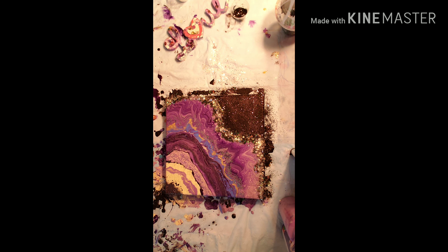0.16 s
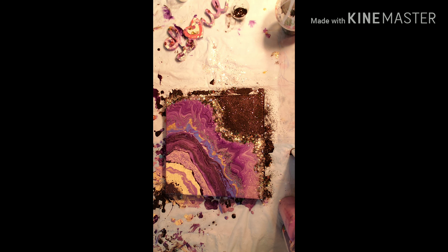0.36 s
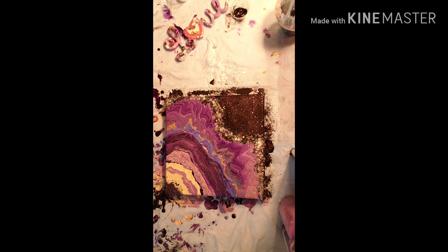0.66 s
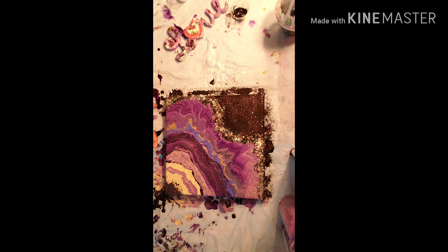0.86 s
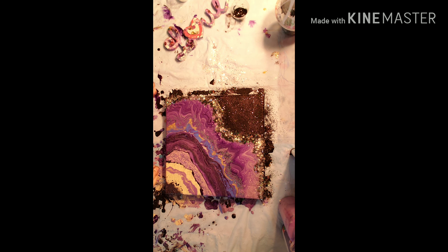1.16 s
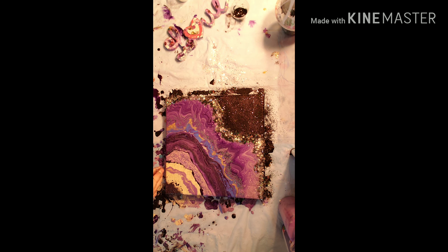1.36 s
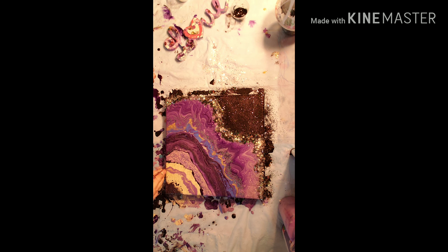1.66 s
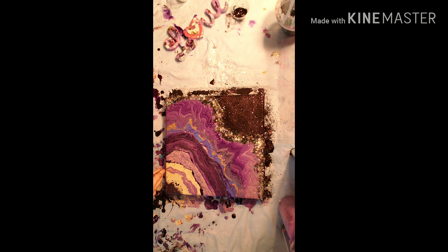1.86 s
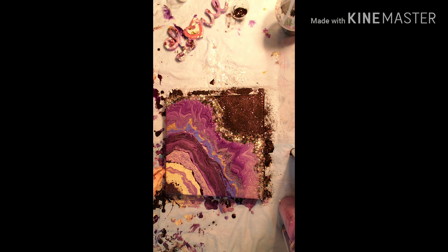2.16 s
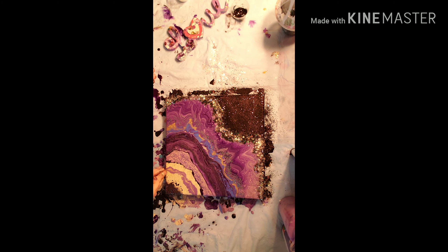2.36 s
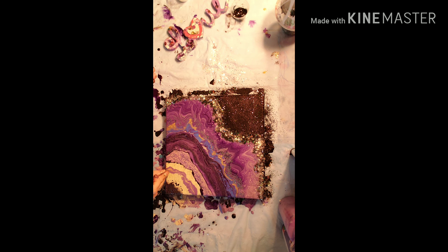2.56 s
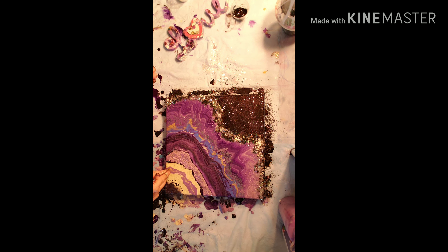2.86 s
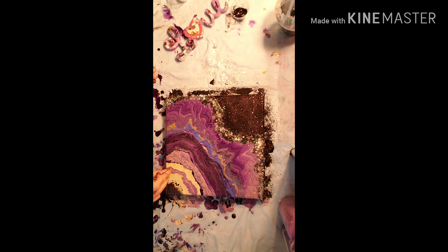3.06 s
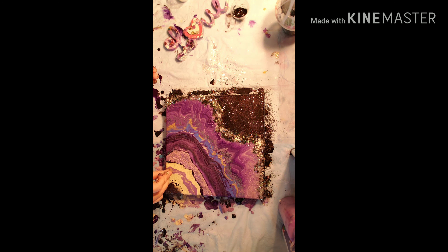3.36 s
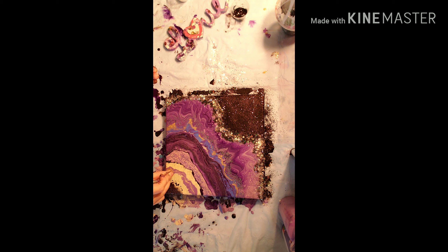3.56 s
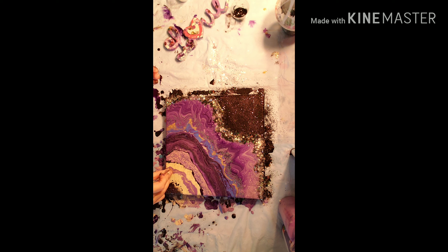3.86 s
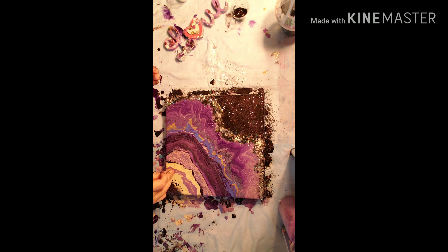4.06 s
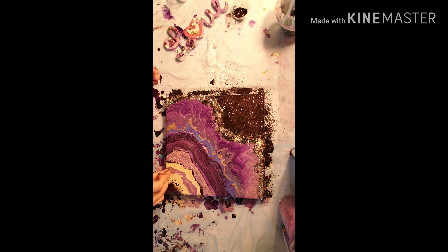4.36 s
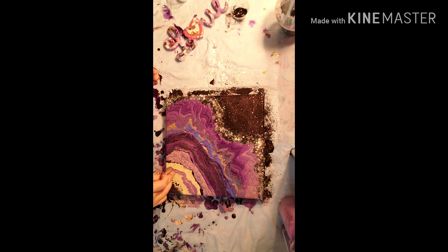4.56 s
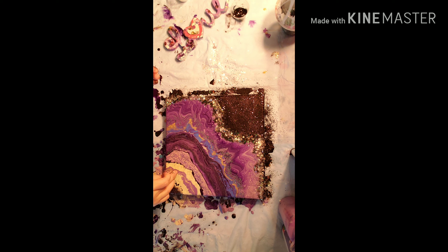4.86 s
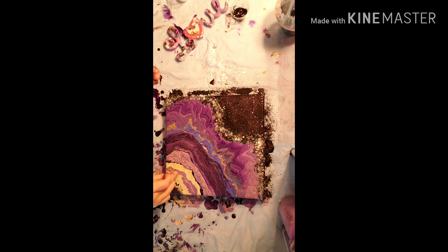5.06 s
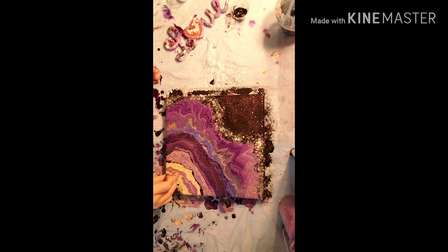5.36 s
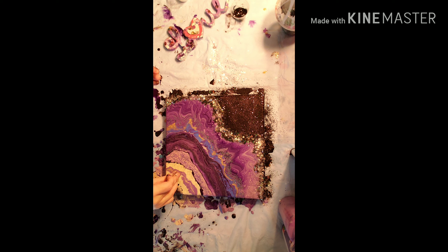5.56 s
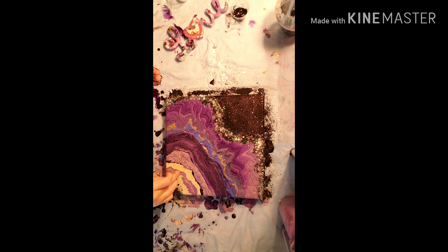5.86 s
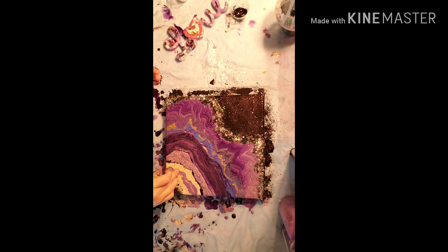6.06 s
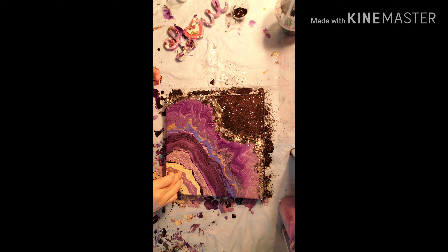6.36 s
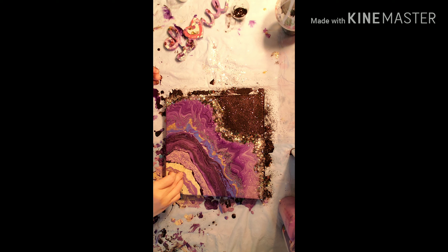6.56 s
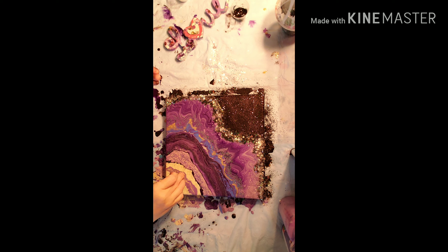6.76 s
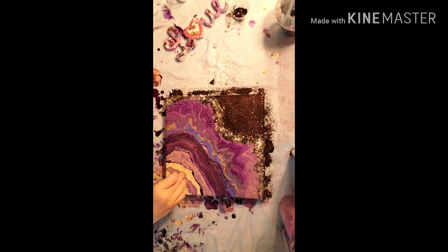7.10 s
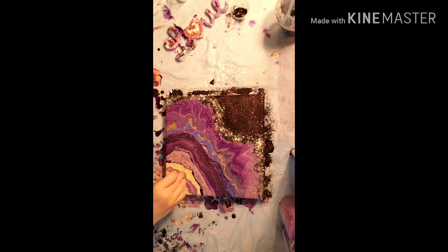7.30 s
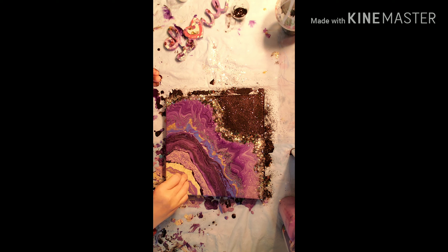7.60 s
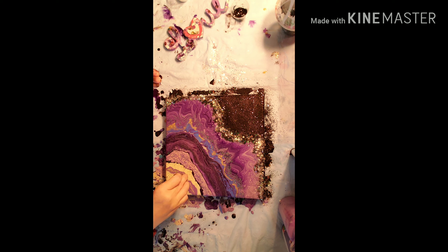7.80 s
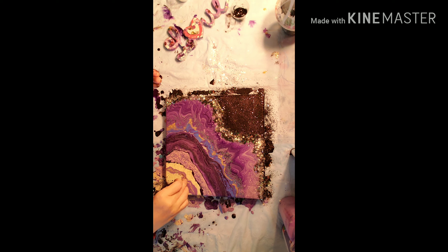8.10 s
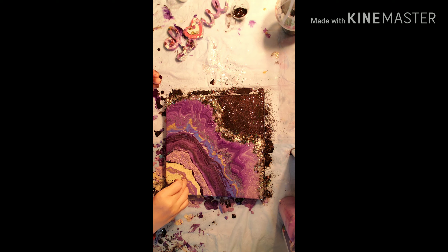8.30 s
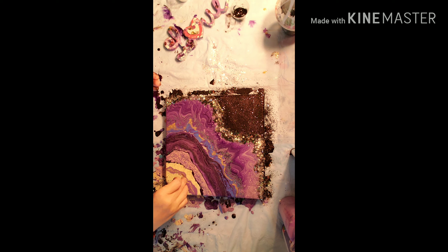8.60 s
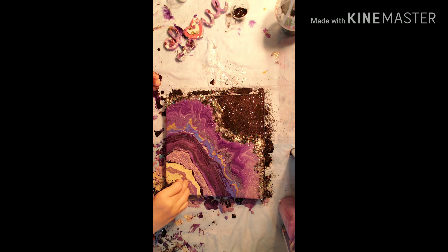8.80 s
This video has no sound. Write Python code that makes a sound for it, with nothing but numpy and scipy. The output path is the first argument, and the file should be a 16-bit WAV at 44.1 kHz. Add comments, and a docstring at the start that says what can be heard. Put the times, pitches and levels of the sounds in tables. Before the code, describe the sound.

A cooling appliance hums and throbs deeply in a quiet room, fans pushing soft air, with faint distant bird whistles and barely audible finger scuffs.

```python
"""A quiet room where a cooling appliance runs: its compressor throbs against the mains hum, two fans
drone and push air, the casing sings weakly and a thin whine swells and fades. All are locked or
wandering sines over shaped noise. Some way off a bird gives six faint falling whistles, gliding sines
with an overtone, while fingers work lightly on a table close by, as short bursts of filtered grit.
The microphones add their own hiss."""
import sys
import numpy as np
from scipy import signal
from scipy.fft import rfft, irfft
from scipy.io import wavfile

SR = 44100
rng = np.random.default_rng(int(sys.argv[2]) if len(sys.argv) > 2 else 0)


def persist_wave(psi):
    """Save psi, clipped to +-1, as 16-bit WAV."""
    counts = np.round(np.clip(psi, -1, 1) * 32767).astype(np.int16)
    wavfile.write(sys.argv[1], SR, np.atleast_2d(counts).T)


N = 394254
TIME = np.arange(N) / SR  # seconds
FREQS = np.fft.rfftfreq(N, 1 / SR)  # Hz
SIDES = np.array([[1], [-1]])  # left, right


def undb(db):
    """Decibels to gain."""
    return 10 ** (np.asarray(db) / 20)


def across(points):
    """A curve through (Hz, value) points, joined on a log-frequency axis."""
    hz, value = np.transpose(points)
    return np.interp(np.log(FREQS + 1), np.log(hz), value)


def walk(rate):
    """Smooth chance of spread 1 that moves about rate times a second."""
    lowpass = np.exp(-.5 * np.minimum(FREQS / rate, 20) ** 2)
    y = irfft(rfft(rng.standard_normal(N)) * lowpass, N)
    return (y - y.mean()) / y.std()


def tone(phase, db, pan_db, lead):
    """A sine as it reaches the two microphones through the room's standing waves; lead in radians."""
    gain = np.sqrt(2) * undb(db + SIDES * pan_db / 2)
    return gain * np.cos(phase + SIDES * lead / 2)


def orders(lines, phase):
    """The lines of one part, each a whole multiple locked to its turning."""
    return sum(tone(round(k) * phase, db, pan_db, lead) for k, db, pan_db, lead in lines)


# How alike the noise is at the two ears. Each row: frequency in Hz, likeness from 0 to 1.
LIKENESS = [(60, .98), (130, .95), (180, .75), (250, .95), (380, .68), (490, .8), (640, .35), (900, .4),
            (1300, .5), (1800, .1), (4000, .03), (15000, 0)]
# How the noise leans to one side. Each row: frequency in Hz, left minus right in dB.
BALANCE = [(110, -0.7), (200, -3), (700, -3), (1300, -1.3), (2400, 1.2), (5200, 2), (7400, 5.5),
           (8600, 0.5), (11000, 0), (11900, -3), (13000, 0), (15000, -3.5)]
LEFT_LEAD_S = .00027


def noise(spectrum):
    """Stereo noise of a given dB per Hz: its shared part reaches the left first; the treble is unrelated."""
    shared, *own = rfft(rng.standard_normal((3, N)))
    like = np.clip(across(LIKENESS), 0, 1)
    left_first = np.exp(1j * np.pi * FREQS * LEFT_LEAD_S * SIDES)
    pair = np.sqrt(like) * shared * left_first + np.sqrt(1 - like) * np.array(own)
    color = undb(across(spectrum) + SIDES * across(BALANCE) / 2)
    return irfft(pair * color, N) * np.sqrt(SR / 2)


def room(x, t60, wet_db):
    """Direct sound plus a short diffuse tail (t60 in seconds), different at each microphone."""
    t = TIME[:SR // 2]
    envelope = np.exp(-np.log(1000) * t / t60) * (1 - np.exp(-t / 0.0037))
    tail = rng.standard_normal((2, len(t))) * envelope
    tail /= np.sqrt(np.sum(tail ** 2, axis=1, keepdims=True))
    wet = signal.fftconvolve(x[None], tail, axes=1)[:, :N]
    return (x + undb(wet_db) * wet) / np.sqrt(1 + undb(2 * wet_db))


SHAFT_HZ, MAINS_HZ = 58.64, 60.02
THROB_S, BASS_SWELL_S = 4.367, 3.9  # moments when shaft meets mains, and when the bass tones fall in step
# Lines of the compressor shaft. Each row: multiple of the shaft rate, level in dB,
# left minus right in dB, left lead in radians.
COMPRESSOR = [(2, -44.5, 0, -0.62), (4, -72, 3, 3.5), (6, -88.5, -4, 0.5), (11, -85.5, -9, 3.5),
              (13, -83, 3, -0.5), (14, -90.5, -10.5, 1.4), (21, -90.5, -6, 1)]
# Mains hum of the magnetised iron. Each row: multiple of the mains rate, level in dB,
# left minus right in dB, left lead in radians.
MAINS = [(2, -44.5, -0.5, -0.14), (4, -69.5, 5.5, -0.013), (6, -81.5, 1, -1.5)]
# Close low tones at and just above the shaft rate. Each row: Hz above the shaft rate, level in dB.
BASS_TONES = [(0, -47.5), (.38, -57), (0.691, -50)]


def compressor(wander_rad=0.024):
    """The motor slips just behind the mains, so their second multiples beat nearly three times a second.
    Its once-a-turn note beats slowly with close tones: a swell every second and a half, alternately
    strong and weak."""
    turn = 2 * np.pi * (TIME - THROB_S)
    shaft = SHAFT_HZ * turn + wander_rad * walk(0.52)
    drift = 2 * np.pi * (TIME - BASS_SWELL_S)
    bass = sum(tone(shaft + above_hz * drift, db, pan_db=-0.5, lead=0.24)
               for above_hz, db in BASS_TONES)
    return bass + orders(COMPRESSOR, shaft) + orders(MAINS, MAINS_HZ * turn)


BLOWER_HZ, FAN_HZ = 18.33, 194.98
# Lines of the slow blower wheel. Each row: multiple of the blower rate, level in dB,
# left minus right in dB, left lead in radians.
BLOWER = [(1, -72, -1, .7), (2, -53, -1, .4), (6, -50.5, -1, 0.12), (7, -58.5, -2, .1), (8, -64, 6, 0.37),
          (9, -74.5, -2.5, 0.34)]
# Blade tones of the small fan. Each row: multiple of the blade rate, level in dB before flutter,
# left minus right in dB, left lead in radians.
FAN = [(1, -48, -3.5, 0.78), (2, -60.5, -4.5, 0.91), (3, -81.5, -1.5, 0.67)]


def fans(blower_wobble_rad=0.066, fan_wobble_rad=0.45, flutter_db=1.1):
    """A slow blower wheel and a small fan whose blade tones flutter in the turbulent air, the higher more."""
    blower_turn = 2 * np.pi * (BLOWER_HZ * TIME + rng.random())
    blower = orders(BLOWER, blower_turn + blower_wobble_rad * walk(0.7))
    blades = 2 * np.pi * FAN_HZ * TIME + fan_wobble_rad * (walk(0.56) + .5 * walk(7))
    fan = sum(orders([line], blades) * undb(flutter_db * line[0] * walk(6.2)) for line in FAN)
    return blower + fan


# Steady tones of the casing. Each row: frequency in Hz, level in dB, left minus right in dB,
# left lead in radians.
CASING = [(67.75, -54, -0.2, -0.2), (90.6, -55, 0, -0.3), (101.7, -54.5, 1.5, 0.05), (145.3, -63, 0, 0),
          (175.9, -65, -8.5, 0), (824, -85.5, 7.5, -0.7), (1006, -86.5, -7, 0.4), (1185, -84, -3.5, -2.5),
          (1238, -87, -6, 2), (3900, -99, -2.5, 1.2), (8213, -102, 8, 4), (8332, -104, 3.5, 1.2)]


def casing(wobble_rad=0.21):
    """Weak tones of the vibrating casing, each wandering in phase on its own."""
    return sum(tone(2 * np.pi * (hz * TIME + rng.random()) + wobble_rad * walk(0.99), db, pan_db, lead)
               for hz, db, pan_db, lead in CASING)


WHINE_HZ, WHINE_BEAT_HZ, WHINE_SWELL_S = 1121.35, 1.33, 4.66


def whine():
    """Two close high tones that swell and fade as they beat."""
    phase = 2 * np.pi * WHINE_HZ * TIME
    beat = 2 * np.pi * WHINE_BEAT_HZ * (TIME - WHINE_SWELL_S)
    lower = tone(phase, db=-73.5, pan_db=-1.5, lead=2.07)
    upper = tone(phase + beat, db=-80.0, pan_db=1.0, lead=1.8)
    return lower + upper


# Duct rumble. Each row: frequency in Hz, density in dB per Hz before the sway.
RUMBLE = [(18, -89.5), (29, -77), (40, -70.5), (50, -65.5), (59, -64.5), (70, -58), (85, -64.5),
          (102, -61.5), (122, -63), (138, -70), (188, -71), (208, -79), (250, -77.5), (400, -105),
          (900, -160)]
# Rushing air. Each row: frequency in Hz, density in dB per Hz before the sway.
AIR = [(150, -96.5), (280, -81.5), (345, -83.5), (385, -82), (425, -85.5), (485, -85.5), (560, -92.5),
       (790, -92.5), (1000, -94.5), (1210, -99), (1340, -103.5), (1600, -110.5), (3500, -118.5),
       (7000, -136)]


def airflow(rumble_sway_db=0.85, air_sway_db=1.0):
    """Low duct rumble that sways slowly, under a rush of air that flutters faster."""
    rumble = noise(RUMBLE) * undb(rumble_sway_db * walk(1.8))
    return rumble + noise(AIR) * undb(air_sway_db * walk(16.0))


# Every whistle arches to the same top pitch, then falls ever faster while its overtone grows.
WHISTLE_TOP_HZ, WHISTLE_FALL_HZ, WHISTLE_CREST_SHARE, WHISTLE_BEND = 3494, 325.3, .19, 1.4
OVERTONE_OPEN_DB, OVERTONE_CLOSE_DB = -27.5, -9.5  # relative to the whistle
# Bird whistles. Each row: start in seconds, length in seconds, opening level in dB, closing level in dB,
# both before fades, flicker and room.
WHISTLES = [(0.185, 0.29, -80.5, -84), (1.822, 0.26, -80, -71), (2.397, .31, -71.5, -76),
            (3.25, 0.36, -87, -89), (6.326, .285, -73.5, -67.5), (6.848, 0.3, -64.5, -73.5)]


def bird(quaver=.008, rasp_rad=0.18, flicker_db=2.0, onset=0.15, release=0.12, ease_db=-2, pan_db=-4.5):
    """Hoarse whistles that arch, ease off midway and fall, roughening and gaining an overtone."""
    tremor = quaver * walk(170)  # share of the pitch
    flicker = flicker_db * walk(25)
    hoarse = rasp_rad * walk(1100)  # fast phase jitter spreads a faint skirt around the line
    out = np.zeros(N)
    for start, length, open_db, close_db in WHISTLES:
        at = (TIME >= start) & (TIME < start + length)
        u = (TIME[at] - start) / length
        from_crest = np.abs((u - WHISTLE_CREST_SHARE) / (1 - WHISTLE_CREST_SHARE))
        hz = WHISTLE_TOP_HZ - WHISTLE_FALL_HZ * from_crest ** WHISTLE_BEND
        roughness = .5 + u
        phase = 2 * np.pi * np.cumsum(hz * (1 + tremor[at] * roughness)) / SR + hoarse[at] * roughness
        db = open_db + (close_db - open_db) * u + ease_db * np.sin(np.pi * u) ** 2 + flicker[at]
        fade = np.clip(np.minimum(u / onset, (1 - u) / release), 0, 1)  # onset, release: shares of length
        effort = fade * undb(db)
        overtone = undb(OVERTONE_OPEN_DB + (OVERTONE_CLOSE_DB - OVERTONE_OPEN_DB) * u)
        out[at] += np.sqrt(2) * effort * (np.sin(phase) + overtone * np.sin(2 * phase))
    return room(out, t60=0.33, wet_db=1) * undb(SIDES * pan_db / 2)


# Fingertip ticks and scuffs. Each row: start in seconds, length in seconds, level in dB before the room,
# centre in Hz, width in Hz.
TOUCHES = [(1.031, .013, -78.5, 10500, 3400), (1.505, 0.12, -89, 7600, 950), (2.07, .055, -88, 7600, 950),
           (2.315, 0.18, -81.5, 2400, 523), (2.325, 0.24, -87, 7800, 1050), (6.385, .11, -91, 7500, 850),
           (8.355, .21, -86, 2830, 720), (8.455, 0.2, -92, 7700, 950)]


def fingers(grain_db=3, pan_db=2):
    """Fingertips brush gritty paint: each touch is a short, grainy burst that rises fast and dies away."""
    grit = rfft(rng.standard_normal(N) * undb(grain_db * walk(200)))
    out = np.zeros(N)
    for start, length, db, hz, width_hz in TOUCHES:
        band = 1 / (1 + (2 * (FREQS - hz) / width_hz) ** 2)
        rub = irfft(grit * band, N)
        u = np.clip((TIME - start) / length, 0, 1)
        stroke = np.sin(np.pi * np.sqrt(u))  # peaks a quarter of the way in
        out += undb(db) * stroke * rub / rub.std()
    return room(out, t60=.3, wet_db=-8.5) * undb(SIDES * pan_db / 2)


def scene():
    """The appliance fills the room; bird and fingers lie far beneath it."""
    return compressor() + fans() + casing() + whine() + airflow() + bird() + fingers()


TOP_HZ = 15500
# Microphone hiss. Each row: frequency in Hz, density in dB per Hz.
HISS = [(1500, -124), (5000, -122.5), (5700, -124.5), (7600, -120.5), (9000, -123.2), (10800, -118.8),
        (11900, -115.2), (12800, -116.4), (14300, -116.3), (15400, -114.2)]


def record(dry):
    """The microphones add their own hiss and the top is cut steeply."""
    top_cut = signal.ellip(12, .1, 80, TOP_HZ, fs=SR, output="sos")
    return signal.sosfilt(top_cut, dry + noise(HISS))


dry = scene()
out = record(dry)
persist_wave(out)
```